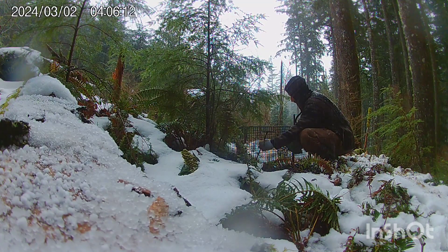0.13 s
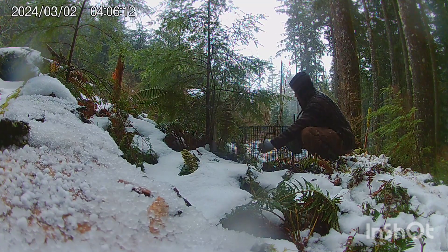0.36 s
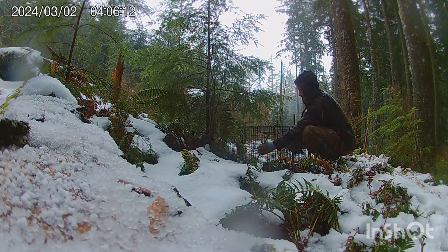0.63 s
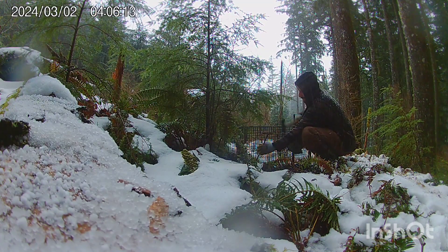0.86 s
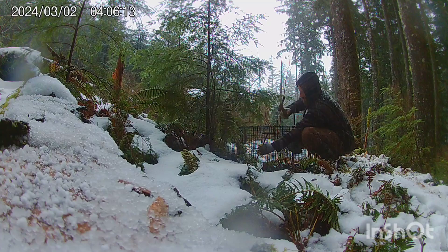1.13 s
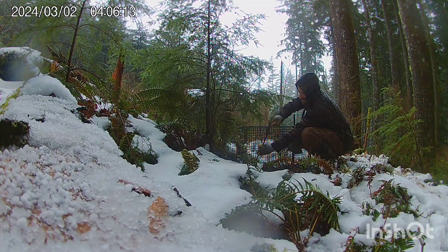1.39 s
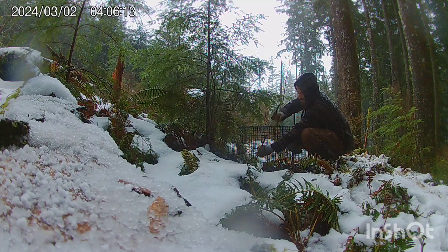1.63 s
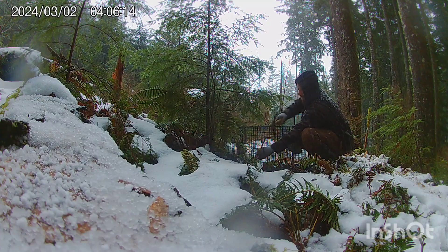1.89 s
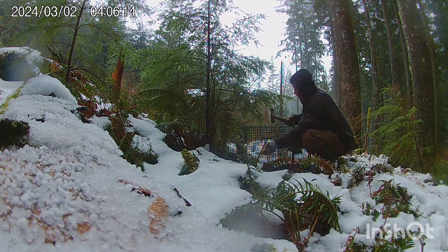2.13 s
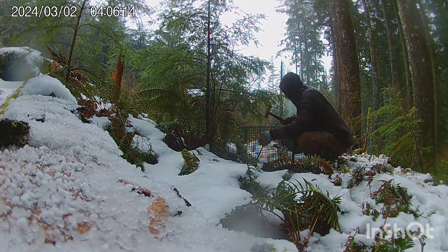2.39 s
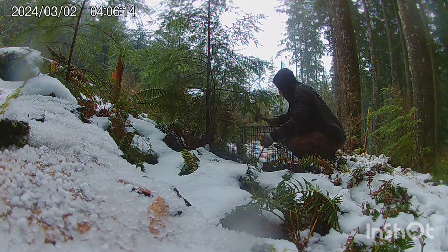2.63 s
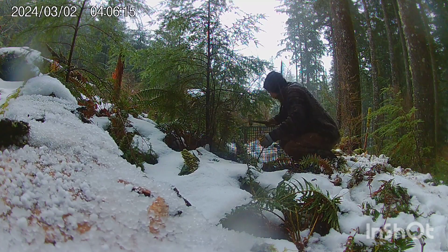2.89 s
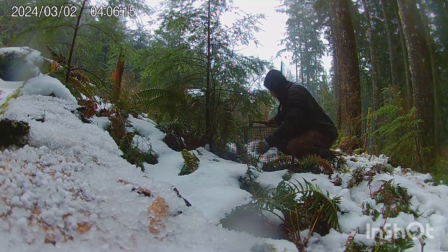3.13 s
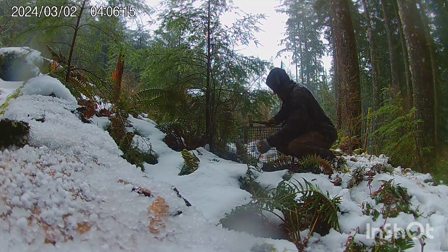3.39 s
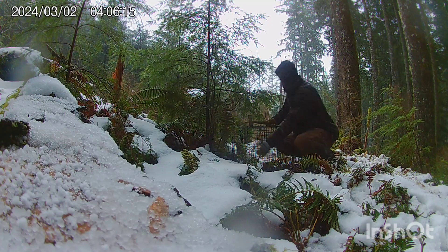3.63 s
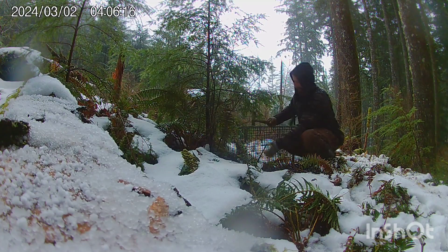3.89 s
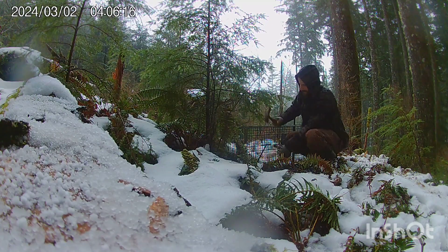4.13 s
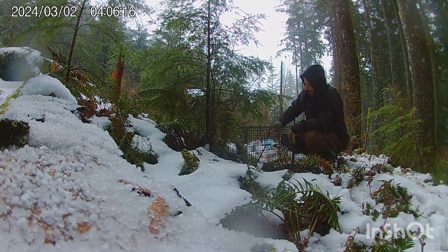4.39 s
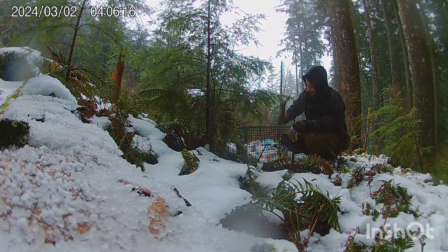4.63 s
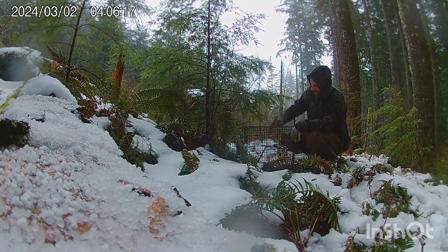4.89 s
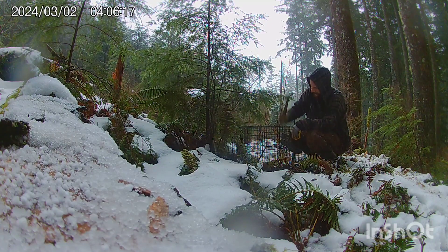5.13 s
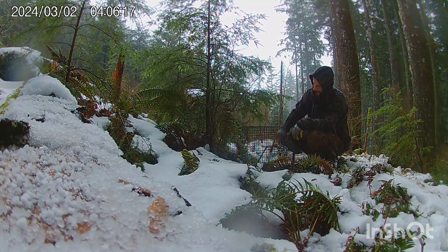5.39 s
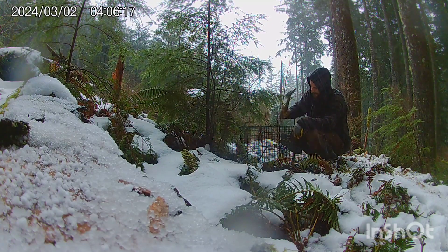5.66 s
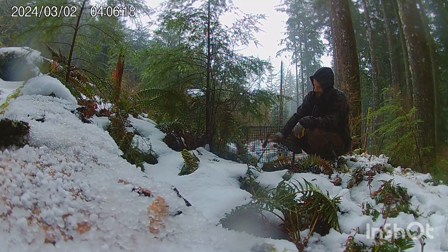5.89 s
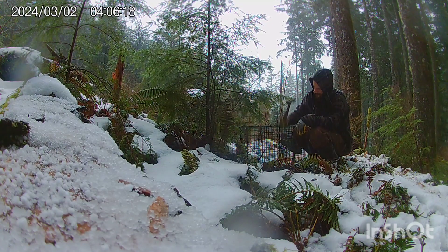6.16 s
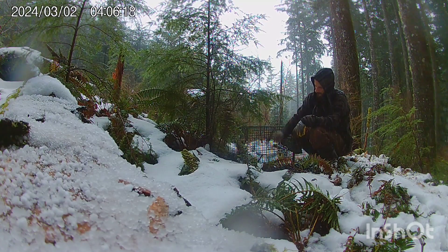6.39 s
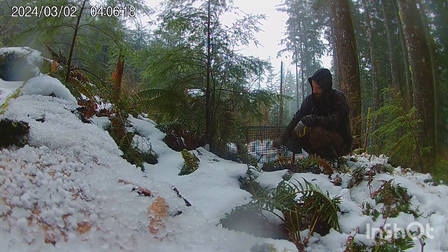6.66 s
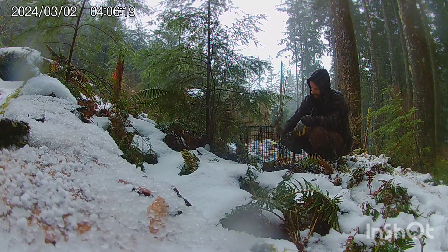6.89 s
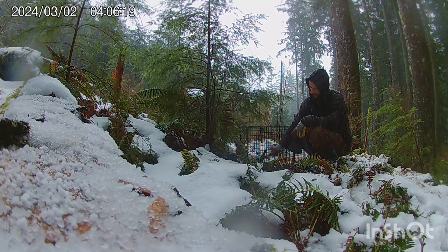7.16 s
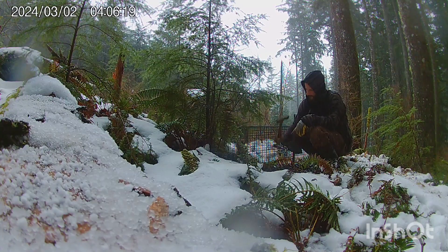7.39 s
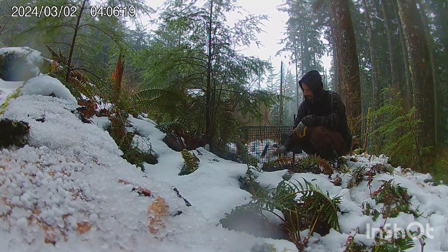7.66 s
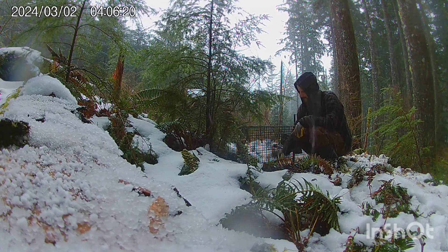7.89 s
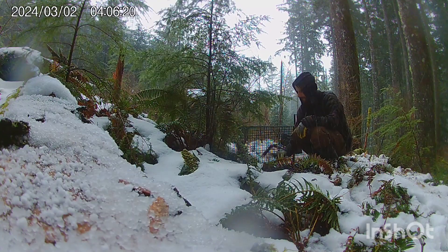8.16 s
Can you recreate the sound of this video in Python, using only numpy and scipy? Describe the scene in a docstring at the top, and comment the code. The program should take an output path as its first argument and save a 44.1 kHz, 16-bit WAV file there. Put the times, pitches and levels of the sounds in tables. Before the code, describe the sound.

A quiet outdoor hush of distant water and forest air, with faint patter, a barely audible thin whine and low wind rumble, runs throughout. Dry little meltwater ticks land close on the microphone housing from 0.7 s. A hammer clinks lightly on a steel stake at 1.3 and 1.6 s. Then only drips, with a crisper one at 2.6 and a very loud snapping tick at 4.0. A weak tap at 4.2 comes with a soft low thud; a firmer blow follows at 4.6, a sharp knocking drip at 5.07 and a close double clink at 5.13. Strong ringing blows continue at 5.75, 6.2, 6.6, 7.0, 7.4 and 7.85 s, hard cracks with bright brief steel ring, some dull rebounds and short diffuse tree echoes. Tiny faint high tones appear between 3.5 and 5.4. Wind rumble swells around 6.3 and most strongly 7.2-7.8, until the end at 8.3.

```python
"""A hammer drives a steel stake in a snowy forest: light taps, then a steady run of ringing blows.
Each blow sums damped steel modes, a noise crack and a thud; trees return a short diffuse echo made of sparse taps.
Melt water drips on the camera housing: tiny noise bursts ring resonances as dry ticks, with faint far patter.
Behind lie faint short steady high tones, the coloured noise of distant water, a thin whine and a low rumble of
wind on the microphone, which also holds a soft thud near 4.24 s. The loudest peaks are softly clipped."""
import sys
import numpy as np
from scipy import signal
from scipy.fft import rfft, irfft
from scipy.io import wavfile
from scipy.ndimage import uniform_filter1d

SR = 44100
rng = np.random.default_rng(int(sys.argv[2]) if len(sys.argv) > 2 else 0)


def wav_record(signal):
    """Record a signal, one row per channel, as 16-bit PCM in the file named by sys.argv[1]."""
    frames = np.transpose(np.atleast_2d(signal))
    bounded = np.clip(frames, -1, 1)
    # unit amplitude maps onto the largest positive 16-bit level
    quanta = np.round(bounded * 32767).astype(np.int16)
    wavfile.write(sys.argv[1], SR, quanta)


def voltage_ratio(level):
    """Linear amplitude factor for a level in decibels (scalar or array-like)."""
    return 10 ** (np.asarray(level, float) / 20)


N = 365148  # samples


def evened(x):
    """Scales to rms 1."""
    return x / np.sqrt(np.mean(x ** 2) + 1e-20)


def read(points, hz):
    """Reads a spectrum on a log-frequency axis."""
    f, value = np.transpose(points)
    return np.interp(np.log(hz + 1), np.log(f + 1), value)


def curve(rows, t):
    """Reads a control curve in time."""
    return np.interp(t, *np.transpose(rows))


def add(mix, s, sound):
    """Mixes a sound in at s seconds."""
    part = mix[round(s * SR):][:len(sound)]
    part += sound[:len(part)]


def coloured(x, points):
    """Gives noise a spectrum, at rms 1."""
    hz = np.fft.rfftfreq(len(x), 1 / SR)
    return evened(irfft(rfft(x) * voltage_ratio(read(points, hz)), len(x)))


def resonance(x, hz, width_hz):
    """A two-pole resonance of gain 1 at its peak."""
    r = np.exp(-np.pi * width_hz / SR)
    edge = (1 - r * r) / 2
    return signal.lfilter([edge, 0, -edge], [1, -2 * r * np.cos(2 * np.pi * hz / SR), r * r], x)


def hammering():
    """Blows, rebounds and askew blows on the stake, in two groups that get echoes of their own."""
    # blows: t/s, knock level/dB, then ringing level/dB of low bend, middle bend, lengthwise and high bend
    blows = [(1.3198, -21.5, -36.5, -35.5, -49, -36.5), (1.6284, -14, -27, -34, -41, -43),
             (4.2239, -19.5, -39.5, -51, -65, -56), (4.6391, -7, -23, -31.5, -34, -28),
             (5.1263, -9, -30.5, -32, -24, -39), (5.1558, -15, -24, -39, -36.5, -39),
             (5.7473, -5.5, -21.5, -22, -18, -19), (6.1662, -2.5, -12.5, -19, -21.5, -26),
             (6.5863, -3.5, -34, -19, -26, -15), (7.006, -4.5, -15, -21, -22, -16.5),
             (7.4044, -5, -10.5, -23, -27.5, -21.5), (7.8493, -7.5, -14, -25.5, -19, -24)]
    # the head bounces back on the stake with a dull knock: t/s, knock level/dB
    rebounds = [(1.338, -25), (4.644, -12.5), (5.769, -19), (6.187, -14), (6.614, -16.5), (7.029, -19.5)]
    # blows that land askew also ring the cross modes: t/s, low cross mode level/dB, high cross modes level/dB
    askew = [(1.319, -36, -35.5), (1.627, -20.5, -32.5), (4.2212, -39, -49), (4.6387, -41, -37),
             (5.1274, -32, -30), (5.1544, -25, -33)]
    groups = np.zeros((2, N))
    for k, (s, *levels_db) in enumerate(blows):
        add(groups[k // 2 % 2], s, blow(levels_db))
    for s, db in rebounds:
        add(groups[1], s, blow(db - np.array([0, 22, 30, 30, 30])))
    for s, *levels_db in askew:
        add(groups[0], s, ring(levels_db, first=5))
    return groups


def blow(levels_db):
    """The ringing steel, a crack with a short rattle, and a thud through the ground."""
    # crack of steel on steel at first contact: f/Hz, relative level/dB
    crack_spectrum = [(120, -41), (250, -28.5), (1200, -0.5), (2200, -10), (4000, -14), (6000, -23),
                      (9000, -19.5), (16000, -44)]
    t = np.arange(SR // 2) / SR
    noise = rng.standard_normal((3, len(t)))
    # a fast burst, then a weaker and longer rattle
    rattle = (1 - np.exp(-t / 0.00021)) * (voltage_ratio(-60 * t / 0.013) + voltage_ratio(-18 - 60 * t / 0.16))
    crack = voltage_ratio(levels_db[0] - 7.5) * coloured(noise[0], crack_spectrum)
    # blows that ring the high modes also hiss more
    hiss_band = evened(resonance(resonance(noise[1], 11000, 7000), 12600, 10300))
    hiss = voltage_ratio(np.mean(levels_db[-2:]) + 6.0) * hiss_band
    thud_fall = (1 - np.exp(-t / 0.014)) * voltage_ratio(levels_db[0] - 31.5 - 60 * t / 0.14)
    thud = evened(resonance(noise[2], 75, 53)) * thud_fall
    return ring(levels_db, first=0) + rattle * (crack + hiss) + thud


def ring(levels_db, first):
    """Modes of stake and hammer head, from group number first on: a quick fall, then a wavering after-ring."""
    # modes f/Hz, one group for each level column of the blows, then of the askew blows
    steel_hz = [
        [1200, 1420, 2540, 3280, 5520],
        [1648],
        [3980, 4017, 6590, 7560, 7745, 13150],
        [4845, 9442, 13570, 14530, 15020],
        [10262, 10760, 10920, 12020],
        [1912],
        [1430, 3280, 4872, 5525, 7575, 8204, 8455, 13200],
    ]
    # the same modes: relative level/dB, t60/s while hand and ground damp them, faint long after-ring level/dB
    steel_ring = [
        [(1.5, 0.022, -73), (-2, 0.02, -43), (-7, 0.014, -60), (-25.5, 0.051, -69), (-21, 0.029, -41)],
        [(8, 0.078, -39)],
        [(6, 0.077, -26.5), (3.5, 0.078, -26.5), (-11.5, 0.075, -28), (-10, 0.052, -23), (-0.5, 0.056, -33),
         (-12, .035, -43)],
        [(1.5, 0.022, -39), (1, 0.079, -41), (-25, .04, -50), (-3, 0.034, -50), (-16, .06, -38)],
        [(-3, 0.17, -33), (1.5, 0.052, -35.5), (-9, .05, -39), (-43, .05, -35)],
        [(-6, 0.13, -36)],
        [(17.5, 0.035, -60), (6, 0.035, -50), (6, 0.032, -55), (0, 0.017, -55), (3, 0.055, -35),
         (-4, 0.041, -52), (5.5, 0.032, -46), (-3, 0.068, -45)],
    ]
    after_ring_t60 = 0.61  # s
    t = np.arange(SR // 2) / SR
    out = np.zeros(len(t))
    for level_db, group_hz, group in zip(levels_db, steel_hz[first:], steel_ring[first:]):
        chances = rng.standard_normal((len(group), 3))
        for hz, (db, t60, after_db), (spot, tune, start) in zip(group_hz, group, chances):
            # the stake trembles in its hole: strength and phase of the after-ring wander
            a, b = rng.standard_normal((2, 60))
            wander = np.interp(t / 0.0074, np.arange(60), a + 1j * b)
            fall = voltage_ratio(-60 * t / t60) + wander * voltage_ratio(after_db - 60 * t / after_ring_t60)
            wave = fall * np.exp(1j * (2 * np.pi * hz * (1 + 0.001 * tune) * t + 0.3 * start))
            # each blow lands on another spot, so the share of a mode varies a little
            out += voltage_ratio(level_db + db + 1.94 * spot) * wave.imag
    return out * (1 - np.exp(-t / 0.0011))


def trees(x):
    """Sparse echoes from trunks, one in every 20 samples, each band dying at its own speed."""
    # echo decay: f/Hz, t60/s
    decay = [(300, 0.073), (1500, 0.2), (4000, 0.56), (9000, 0.42), (16000, 0.17)]
    taps = np.zeros(SR)
    at = np.arange(400, SR - 20, 20)
    taps[at + rng.integers(0, 20, len(at))] = rng.choice([-1., 1.], len(at))
    hz, t, z = signal.stft(taps, SR, nperseg=256)
    fading = z * voltage_ratio(-60 * t / read(decay, hz)[:, None])
    tail = signal.istft(fading, SR, nperseg=256)[1]
    return signal.fftconvolve(x, tail / np.linalg.norm(tail))[:N]


def dull_knocks():
    """Places the knocks without ring."""
    # t/s, level setting/dB, f/Hz
    knocks = [(2.947, -44, 2000), (2.9619, -26.5, 1630), (4.676, -17.5, 1600), (5.0725, -9, 2200),
              (2.581, -34.5, 2200), (2.764, -36, 2000), (4.03, -31, 2460)]
    out = np.zeros(N)
    for s, db, hz in knocks:
        add(out, s, knock(db, hz))
    return out


def knock(db, hz):
    """One push that dies within two or three cycles."""
    cycles = np.arange(600) / SR * hz
    swing = np.sin(2 * np.pi * cycles) * np.exp(-0.9 * cycles) * (1 - np.exp(-4 * cycles))
    return -voltage_ratio(db + 9.5) * swing


def near_drips():
    """Places the clear drips on the housing, each a very short splat."""
    # t/s, low tick peak level/dB, high tick peak level/dB, low tick f/Hz, high tick f/Hz
    drips = [(0.6943, -43.5, -37, 3660, 10200), (0.8063, -41, -44, 4000, 12400),
             (0.8717, -35, -32.5, 3380, 11400), (0.902, -34.5, -58, 4300, 11100),
             (1.067, -31.5, -24, 4800, 11500), (1.28, -39, -45, 3020, 11000),
             (1.6801, -36.5, -52, 4100, 10300), (1.9206, -28.5, -35.5, 4030, 11500),
             (2.051, -38.5, -27.5, 4100, 15100), (2.156, -40, -40, 3450, 11100),
             (2.359, -32.5, -57, 4060, 13700), (2.5595, -34, -29, 3930, 11400),
             (2.582, -21, -20.5, 5300, 11600), (2.6636, -43, -37.5, 3670, 11400),
             (2.765, -27, -27.5, 4170, 15200), (2.976, -36.5, -40, 3590, 13700),
             (2.9984, -36, -33, 3530, 11140), (3.047, -41, -41, 5500, 13900),
             (3.158, -35, -30, 3950, 15400), (4.0315, -7, -1.5, 4880, 11150),
             (4.376, -39, -42, 4020, 11500), (4.6753, -16.5, -52, 3530, 10300),
             (4.9854, -37, -39, 5060, 9400), (5.072, -4.5, -9.5, 3830, 12100),
             (5.314, -26, -36, 4460, 11100), (5.3526, -22.5, -19, 4670, 11900),
             (5.389, -44, -36, 3770, 14200), (6.0024, -31, -29.5, 3660, 13400),
             (6.0377, -43, -37, 3730, 12300), (7.213, -40, -60, 4010, 10800),
             (7.3235, -38.5, -35, 4230, 13400), (7.6137, -24.5, -36, 3920, 11700),
             (7.6864, -46, -36, 3940, 14900), (7.706, -53, -23.5, 4020, 10900),
             (7.7844, -47, -38, 3730, 11500), (7.8325, -49, -31, 4300, 11900)]
    out = np.zeros(N)
    for s, *row in drips:
        add(out, s, drip(*row, t60=0.0042))
    return out


def drip(low_db, high_db, low_hz, high_hz, t60):
    """A very short splat rings its own two resonances and, by chance shares, those of the plastic shell."""
    # low group, then high group of shell resonances: f/Hz, width/Hz
    shells = [
        [(1700, 520), (2600, 230), (3800, 210), (5500, 190)],
        [(8600, 300), (10900, 450), (12500, 670), (15000, 290)],
    ]
    scrape_t60 = 0.023  # s, the faint scrape after a splat
    t = np.arange(1024) / SR
    fall = voltage_ratio(-60 * t / t60) + voltage_ratio(-23.5 - 60 * t / scrape_t60)
    splat = rng.standard_normal((2, len(t))) * (1 - np.exp(-t / 0.00022)) * fall
    shares = rng.random((2, 4))
    levels_db = low_db, high_db
    resonances = (low_hz, 300), (high_hz, 700)  # Hz, width Hz
    out = np.zeros(len(t))
    for noise, db, own, shell, share in zip(splat, levels_db, resonances, shells, shares):
        tick = 0.53 * noise + resonance(noise, *own)
        tick += sum(1.14 * k * resonance(noise, *mode) for k, mode in zip(share, shell))
        tick = resonance(tick, own[0], 0.46 * own[0])  # dark below and above
        out += voltage_ratio(db) * tick / abs(tick).max()
    return out


def patter():
    """Faint far drips at random moments, some duller, some brighter."""
    out = np.zeros(N)
    for when, faintness, low, high, dullness in rng.random((60, 5)):
        db = -59 - 3.5 * np.log(faintness + 0.02)
        high_db = db + 8.5 - 5.6 * dullness
        add(out, when * N / SR, drip(db, high_db, 3000 + 3000 * low, 9500 + 6000 * high, t60=0.01))
    return out


def high_tones():
    """Places the faint short steady high tones, some at the same moment."""
    # t/s, f/Hz, level/dB, length/s
    tones = [(3.553, 4850, -50, 0.02), (3.553, 5430, -55, 0.015), (3.555, 13800, -56, .025),
             (3.735, 3740, -60.5, .04), (3.735, 14200, -62, .045), (5.078, 6700, -60, 0.046),
             (5.25, 7900, -56, 0.031), (5.433, 12100, -55, .014)]
    out = np.zeros(N)
    for s, *row in tones:
        add(out, s, short_tone(*row))
    return out


def short_tone(hz, db, length):
    """A short steady sine with soft ends."""
    t = np.arange(0, length, 1 / SR)
    return voltage_ratio(db) * np.sin(2 * np.pi * hz * t) * signal.windows.tukey(len(t), 0.4)


def hush():
    """Distant water and forest air: smooth noise, its level varying at random, coloured by the microphone cavity."""
    # spectrum of the hush: f/Hz, relative level/dB
    spectrum = [(15, -12), (25, -1.5), (120, -6.5), (300, -5), (630, -2.5), (900, -2), (1400, -3.5),
                (1750, -5), (2050, -12.5), (3050, -21), (4000, -24), (8800, -31), (11200, -27.5),
                (15500, -30)]
    # microphone cavity peaks: f/Hz, width/Hz, level/dB
    cavity = [(3920, 220, 5.5), (11120, 460, 9.5), (15250, 700, 5)]
    # slow rise and fall of the hush: t/s, level/dB
    swell = [(0, -1), (2, 0.5), (3.4, 0), (3.9, 2.5), (4.4, 0.5), (6, 1.5), (8.28, 1.5)]
    frames, hz = N // 256 + 5, np.fft.rfftfreq(1024, 1 / SR)
    a, b, patches = rng.standard_normal((frames, 513, 3)).T
    patches = evened(uniform_filter1d(uniform_filter1d(patches, 12, 0), 14, 1))
    peaks_db = sum(db / (1 + (2 * (hz - f) / width) ** 2) for f, width, db in cavity)
    # the noise level varies more at random above 9 kHz
    spread_db = np.interp(hz, [9000, 12000], [0.5, 2.2])[:, None]
    colour_db = (read(spectrum, hz) + peaks_db)[:, None]
    z = (a + 1j * b) * voltage_ratio(colour_db + spread_db * patches)
    steady = evened(signal.istft(z, nperseg=1024, noverlap=768)[1][:N])
    return steady * voltage_ratio(-52 + curve(swell, np.arange(N) / SR))


def whine():
    """A thin high tone: noise through a very narrow resonance."""
    return voltage_ratio(-84) * evened(resonance(rng.standard_normal(N), 13745, 27))


def low_rumble():
    """Wind on the microphone, and the soft thud near 4.24 s: low noise of wandering level."""
    # low rumble strength, wind and the soft thud near 4.24 s: t/s, level before the random variation/dB
    strength = [(0, -65.5), (2, -66), (4.15, -68), (4.24, -55), (4.33, -64.5), (5.6, -67), (6.3, -57.5),
                (6.9, -69), (7.15, -55), (7.33, -48.5), (7.43, -54), (7.6, -50.5), (7.75, -55), (7.95, -63),
                (8.16, -54.5), (8.28, -63)]
    gust_db, lump_db = 3.5, -0.2  # random swells of a tenth of a second, and faster lumps
    noise = rng.standard_normal((3, N))
    lumps = evened(uniform_filter1d(uniform_filter1d(noise[0], size=1200), size=1200))
    gusts = evened(uniform_filter1d(uniform_filter1d(noise[2], size=3500), size=3500))
    rumble = evened(resonance(resonance(noise[1], 30, 49), 36, 90))
    return rumble * voltage_ratio(curve(strength, np.arange(N) / SR) + lump_db * lumps + gust_db * gusts)


def scene():
    """Hammer with echoes, knocks, drips, short high tones, hush, whine and low rumble, in one channel."""
    hammer = hammering()
    echo = voltage_ratio(-22) * (trees(hammer[0]) + trees(hammer[1]))
    near = dull_knocks() + near_drips() + high_tones()
    background = patter() + hush() + whine() + low_rumble()
    return (hammer.sum(0) + echo + near + background)[None]


def top_cut(x):
    """Nothing passes above the cut-off."""
    return signal.sosfilt(signal.butter(12, 16970, fs=SR, output="sos"), x)


def record(dry):
    """Soft clipping of the peaks, then a band limit that lets a little of the top through."""
    ceiling = 0.76
    clipped = ceiling * np.tanh(dry / ceiling)
    lowpass = signal.firwin(401, 15760, window=("kaiser", 8), fs=SR)[None]
    limited = signal.oaconvolve(clipped, lowpass, "same")
    leak = voltage_ratio(-28) * (clipped - limited)
    return top_cut(limited + leak)


dry = scene()
out = record(dry)
wav_record(out)
```